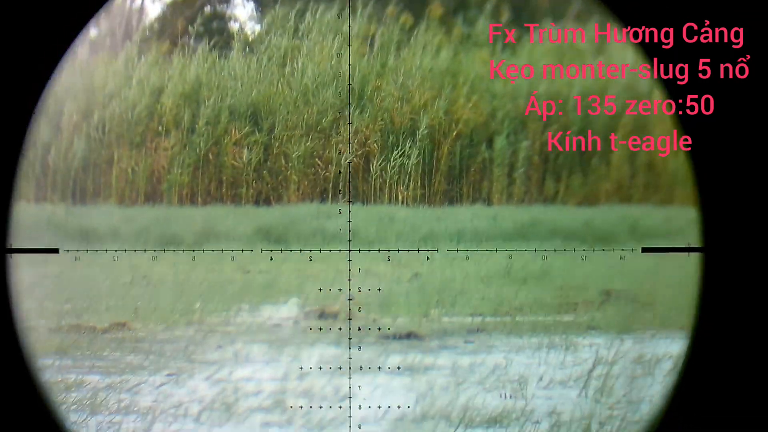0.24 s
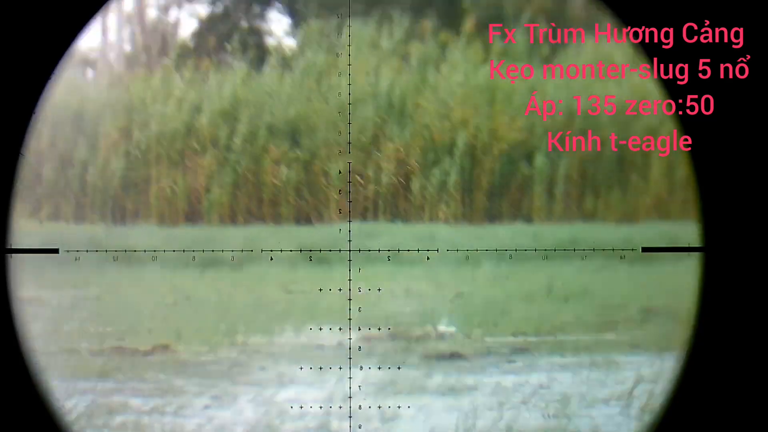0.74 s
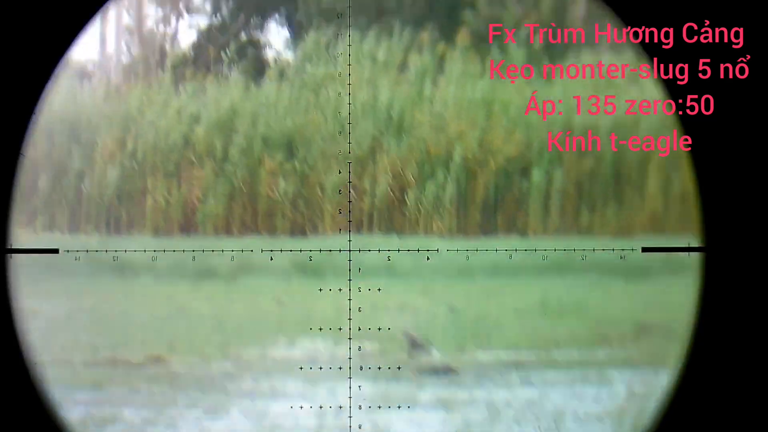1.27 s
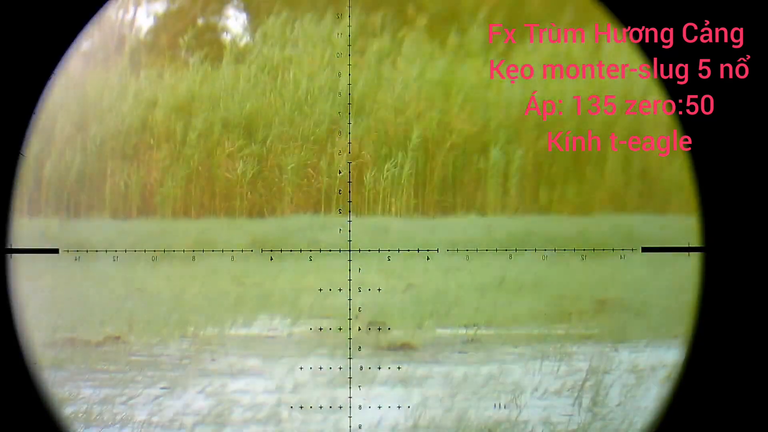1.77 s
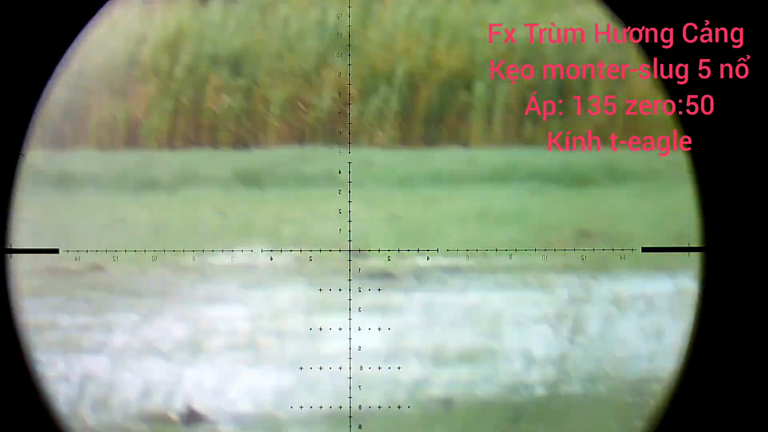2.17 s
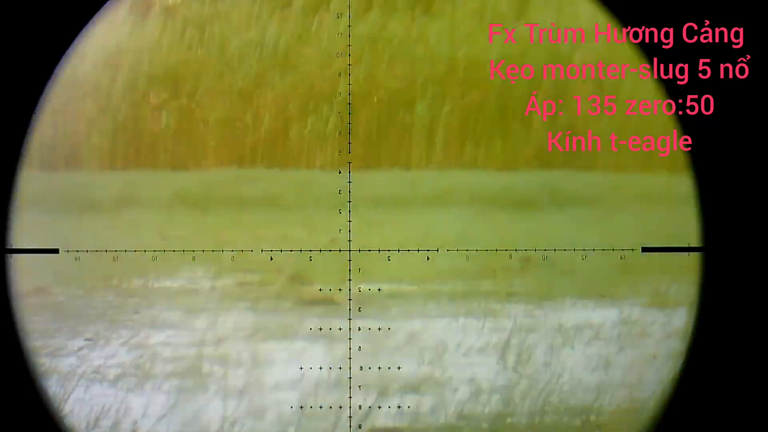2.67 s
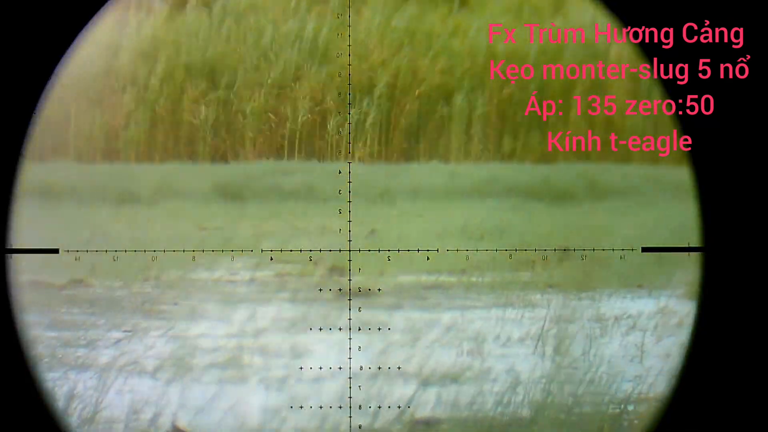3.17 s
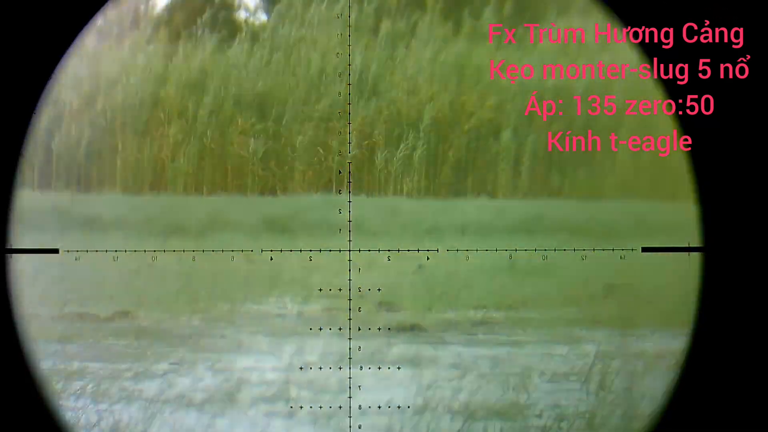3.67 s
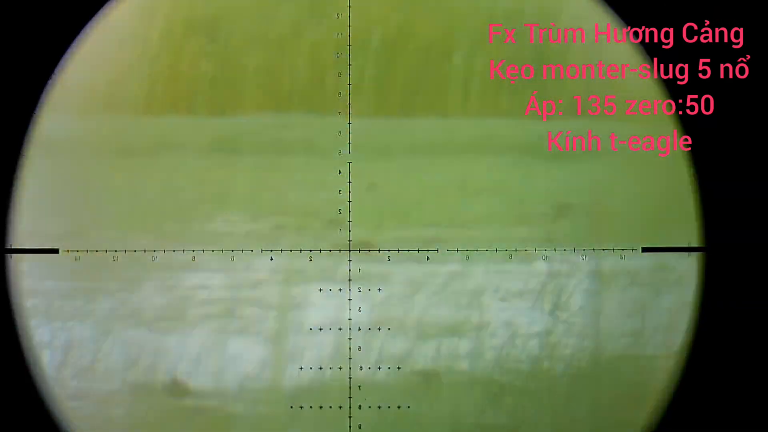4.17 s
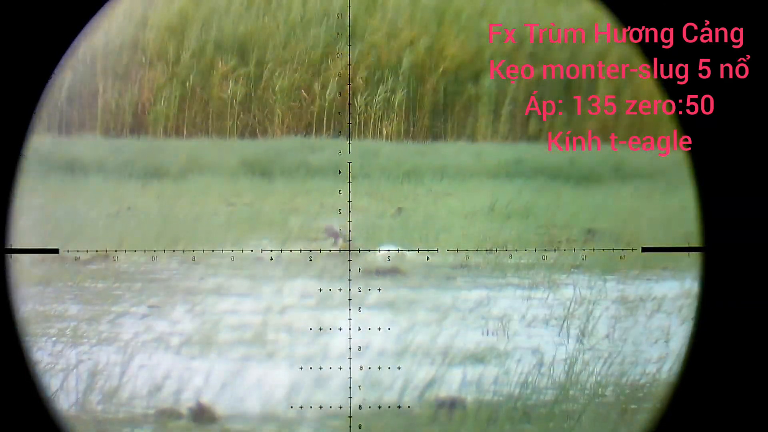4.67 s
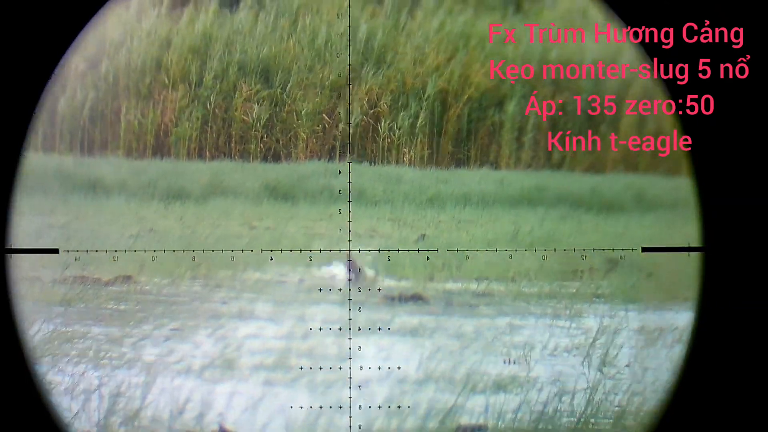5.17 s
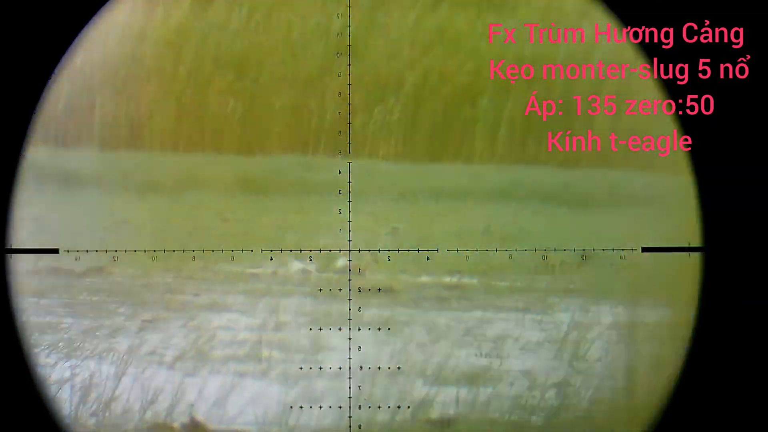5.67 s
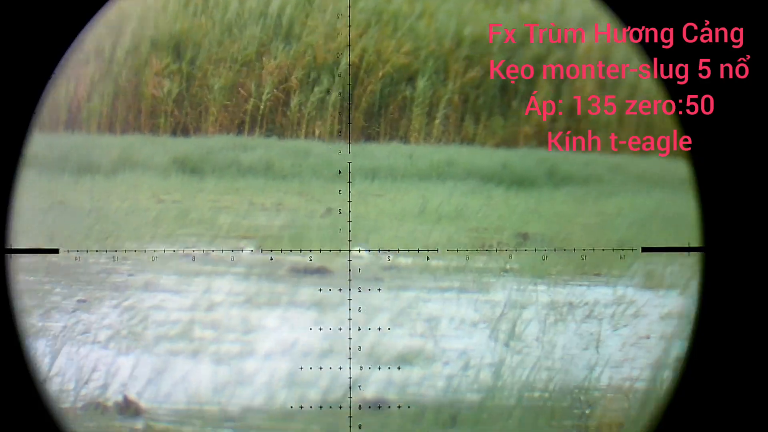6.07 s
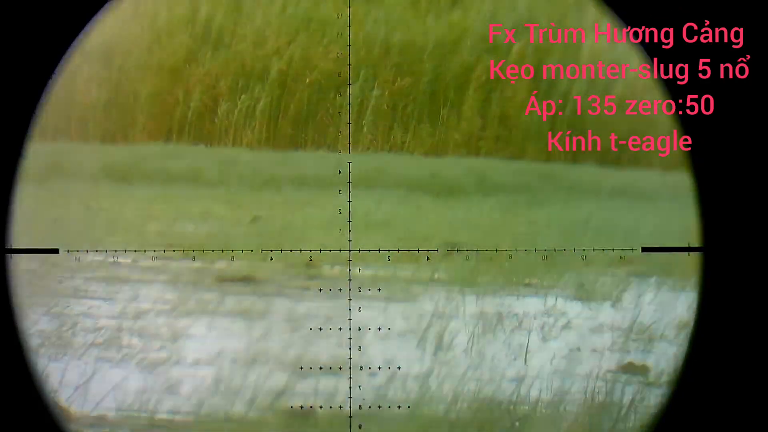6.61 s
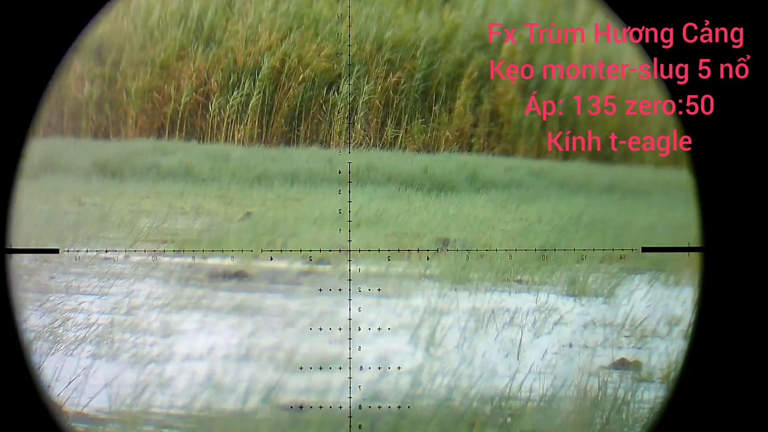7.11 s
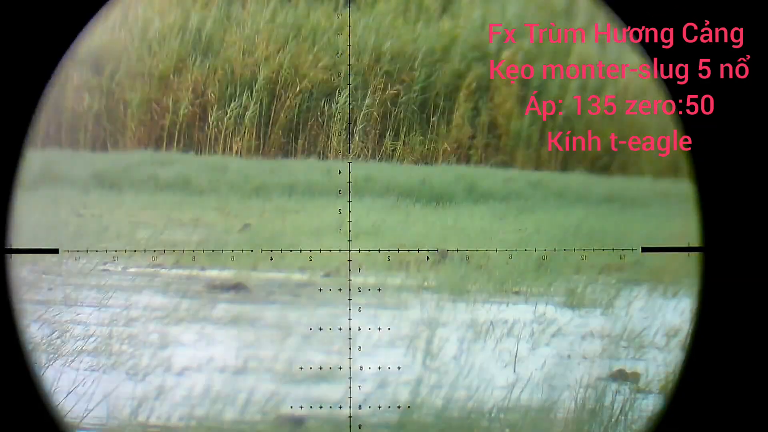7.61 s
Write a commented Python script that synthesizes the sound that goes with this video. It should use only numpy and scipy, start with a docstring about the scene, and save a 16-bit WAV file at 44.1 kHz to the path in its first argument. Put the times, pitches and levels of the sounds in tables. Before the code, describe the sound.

From the start, an air rifle is worked right beside the microphone. A crisp click at 0.14 s is followed by short scratchy slides and knocks at 0.35, 0.53 and 0.7 s. The heaviest metal clacks come in close clusters at 1.0 and 1.15 s, with a last bright snap at 1.43 s, overloading slightly and ringing briefly in a hard, mid-pitched way. A very faint spring tone lingers. From 1.6 to 2.3 s there are only small ticks, soft bumps and skin rubbing the stock, then a dull low thud with a click near 2.4 s. After 2.7 s it is quiet: low, fluttering wind, faint reed rustle, far wash and steady hiss. Soft wing slaps on distant water come around 2.8, 3.0, 3.5, 4.5 and 4.8 s, clearer at 5.5, 5.9 and 6.2 s. The breeze swells near 5.7 s, then sinks to near silence after 6.7 s.

```python
"""An air rifle is reloaded at the edge of a marsh, heard by a phone fixed to its scope.
Lever, catch and magazine blows are noise cracks plus ringing modes, loud enough to clip the microphone.
Sliding parts and rubbing hands are streams of tiny contacts; bumps on the stock are decaying sines.
Filtered noise makes the faint wind and the far wash, random ticks the reeds, and noise bursts
the later slaps of a bird's wings on far water."""
import sys
import numpy as np
from scipy import signal
from scipy.fft import rfft, irfft
from scipy.io import wavfile
from scipy.ndimage import uniform_filter1d

SR = 44100
rng = np.random.default_rng(int(sys.argv[2]) if len(sys.argv) > 2 else 0)


def pcm_store(signal):
    """Save signal as 16-bit PCM."""
    levels = np.round(np.clip(np.atleast_2d(signal), -1, 1) * 32767)
    wavfile.write(sys.argv[1], SR, levels.astype(np.int16).T)


N = 346185
T = np.arange(N) / SR


def undb(db):
    """Decibels to gain."""
    return 10 ** (np.asarray(db) / 20)


def unit(x):
    """Scale to rms 1."""
    return x / np.sqrt(np.mean(x ** 2) + 1e-20)


def add(out, start_s, x):
    """Mix x into out at start_s."""
    i = max(int(start_s * SR), 0)
    out[i:i + len(x)] += x[:N - i]


def cut(x, hz, kind, order=4):
    """Butterworth filter."""
    sos = signal.butter(order, hz, kind, fs=SR, output="sos")
    return signal.sosfilt(sos, x)


def colour(x, points, size=4096):
    """Minimum-phase filter through (Hz, dB) points, built from the cepstrum."""
    hz, db = np.transpose(points)
    bins_hz = np.fft.rfftfreq(size, 1 / SR) + 1
    gain_db = np.interp(np.log(bins_hz), np.log(hz), db)
    cepstrum = irfft(np.log(undb(gain_db)))
    # fold onto positive times: causal
    cepstrum[1:size // 2] *= 2
    cepstrum[size // 2 + 1:] = 0
    impulse = irfft(np.exp(rfft(cepstrum)))
    return signal.fftconvolve(x, impulse)[:len(x)]


def noise(points):
    """Coloured noise over the whole scene, rms 1."""
    return unit(colour(rng.standard_normal(N), points))


def fade(t, t60_s):
    """Exponential decay, 60 dB down after t60_s."""
    return np.exp(-np.log(1000) * t / t60_s)


def swell(t, rise_s):
    """Smooth build-up of force from 0 towards 1."""
    return 1 - np.exp(-(t / rise_s) ** 2)


def walk(rate_hz):
    """Random levels at rate_hz joined by slopes, rms 1."""
    k = int(SR / rate_hz)
    levels = rng.standard_normal(N)[:N // k + 1]
    return unit(uniform_filter1d(np.repeat(levels, k), k)[:N])


def grains(rate_hz, spread_db):
    """Random tiny contacts; a positive spread makes a few much stronger than the rest."""
    hits = rng.random(N) < rate_hz / SR
    strength = undb(spread_db * np.minimum(rng.exponential(size=N), 4))
    return hits * rng.standard_normal(N) * strength


def gesture(start_s, length_s, attack_s, t60_s):
    """Envelope of one movement: it builds up, holds and dies away."""
    attack = np.clip((T - start_s) / attack_s, 0, 1)
    return attack * fade(np.maximum(T - start_s - length_s, 0), t60_s)


def weigh(x, treble_db, bass_db, low_hz=450, high_hz=1700, lowest_hz=115):
    """Set bass and treble rms against the middle band, whose peak becomes 1."""
    bass = unit(cut(x, [lowest_hz, low_hz], "band"))
    middle = unit(cut(x, [low_hz, high_hz], "band"))
    treble = unit(cut(x, high_hz, "high", order=6))
    return (middle + undb(treble_db) * treble + undb(bass_db) * bass) / np.abs(middle).max()


# free modes of the rifle: f/Hz, relative level/dB, t60/s
RIFLE_MODES = [(145, -17, .16), (262, -18, .07), (325, -10, .085), (435, -10, .07), (590, -9, .045),
               (655, 0, .075), (703, -10, .09), (824, -12, .15), (890, -15, .15), (950, 2, .058),
               (1075, -2, .035), (1215, -8, .035), (1300, -5, .036), (1460, -11, .025), (1795, -20, .035),
               (2170, -21, .03), (2375, -12, .04), (2572, -5, .045), (2780, -13, .085), (3195, -18, .028),
               (3540, -17, .024), (4365, -22, .055), (4560, -25, .035), (5540, -33, .045),
               (6080, -32, .022), (6520, -33, .02)]


def ring(t, length=1, scatter_db=0, detune=0):
    """Sum of decaying rifle modes; contact point and grip can vary their levels and tuning."""
    hz, db, t60_s = np.transpose(RIFLE_MODES)[:, :, None]
    chance = rng.standard_normal((2, len(hz), 1))
    waves = np.sin(2 * np.pi * hz * (1 + detune * chance[0]) * t)
    gains = undb(db + scatter_db * chance[1])
    return np.sum(gains * fade(t, t60_s * length) * waves, axis=0)


# strokes of sliding metal parts: t/s, length/s, body level/dB, scratch level/dB before scratch_trim_db
STROKES_T_LEN_DB = [(0, 0.027, -44, -67.5), (0.166, 0.016, -39.5, -51), (0.216, 0.019, -39, -57.5),
                    (0.283, 0.13, -49, -67), (0.518, 0.091, -36.5, -64), (0.653, 0.38, -40, -77.5),
                    (0.967, .12, -33, -75.5), (1.117, .03, -29, -49.5), (1.183, .135, -30, -56.5),
                    (1.338, .05, -38, -75.5), (1.56, 0.312, -56, -79.5)]
# metal rubbing on metal: f/Hz, relative density/dB per Hz
RUB_SPECTRUM = [(88, -38), (150, -12), (247, -12), (319, -7), (405, -13), (655, -3), (832, -7),
                (1300, -8.5), (1440, -11.5), (1650, -33), (2810, -23.5), (3060, -41.5), (4460, -39.5),
                (5110, -46), (9000, -62), (11700, -88), (19800, -120)]
# gritty scratch of hard edges: f/Hz, relative density/dB per Hz
SCRATCH_SPECTRUM = [(1500, -17), (2500, -0.5), (2900, -3), (3150, -7), (4000, -1.5), (4400, 2.5),
                    (5100, -13), (5500, -5), (6800, -15), (7900, -32.5), (9000, -20.5), (10500, -22),
                    (12500, -34), (16000, -43.5)]
STROKE_ATTACK_S, STROKE_T60_S = 0.0088, 0.32
SCRATCH_T60_S = 0.08  # edges stop sooner than the body
RATTLE_HZ, RATTLE_DB = 45, -7  # mean tick rate; level against the catches


def sliding(ring_db=-4, scratch_trim_db=3, split_hz=2700, jerk_db=3.0):
    """Friction: tiny catches keep the rifle ringing; loose parts rattle, hard edges scratch."""
    level, scratch = np.zeros((2, N))
    for start_s, length_s, db, edge_db in STROKES_T_LEN_DB:
        body_move = gesture(start_s, length_s, STROKE_ATTACK_S, STROKE_T60_S)
        edge_move = gesture(start_s, length_s, STROKE_ATTACK_S, SCRATCH_T60_S)
        level = np.maximum(level, undb(db) * body_move)
        scratch = np.maximum(scratch, undb(edge_db) * edge_move)
    jerks = undb(jerk_db * walk(70))
    rattle = unit(grains(RATTLE_HZ, 0))
    catches = unit(grains(4600, spread_db=1.0) * jerks) + undb(RATTLE_DB) * rattle
    ringing = unit(signal.fftconvolve(catches, ring(T[:SR // 3]))[:N])
    rub = unit(colour(catches, RUB_SPECTRUM)) + undb(ring_db) * ringing
    body = unit(cut(rub, split_hz, "low")) * level
    grit = unit(grains(2500, spread_db=3) * jerks * undb(3 * walk(90))) + undb(-4) * rattle
    edge = unit(colour(grit, SCRATCH_SPECTRUM)) * scratch * undb(scratch_trim_db)
    return body + edge


# wind strength: t/s, level/dB before rush_db and random swells
GUST_T_DB = [(2.7, -50.5), (3.3, -51), (4.25, -51.5), (4.58, -47), (5.0, -52), (5.3, -47), (5.68, -42.5),
             (6.0, -46.5), (6.3, -45.5), (6.7, -55.5), (6.95, -62), (7.5, -60.5), (7.8, -58.5)]
# rush of air: f/Hz, relative density/dB per Hz
WIND_SPECTRUM = [(71, -31), (120, 3.5), (377, -2), (417, -6), (479, -5.5), (642, -9.5), (720, -18.5),
                 (893, -20.5), (1070, -28.5), (1430, -36.5), (1730, -50), (2500, -49.5), (3250, -76),
                 (5500, -120)]
# eddies on the microphone: f/Hz, relative density/dB per Hz
RUMBLE_SPECTRUM = [(15, -2), (30, -3.5), (50, 1), (90, -2), (140, -3.5), (200, -9), (400, -28.5),
                   (1000, -61)]
# rustle of dry reeds: f/Hz, relative density/dB per Hz
REEDS_SPECTRUM = [(900, -16), (1600, -6.5), (2400, -3), (2900, -5), (3600, 8), (4200, -0.5), (5000, -15.5),
                  (6500, -12.5), (8000, -23), (14000, -35.5)]
BREEZE_DB = -51  # reference strength
# level at the reference, and dB per dB of gust
RUMBLE_DB, RUMBLE_DB_PER_DB = -45.5, 0.38
REEDS_DB, REEDS_DB_PER_DB = -78.5, 0.6


def wind(rush_db=2.0, eddy_db=1.7, swell_db=0.77, flutter_db=5.0, tick_db=-10):
    """One gust strength drives air rush, eddies on the microphone and reeds ticking together."""
    gust_db = np.interp(T, *np.transpose(GUST_T_DB)) - BREEZE_DB + swell_db * walk(10)
    air_db = BREEZE_DB + gust_db + rush_db + eddy_db * walk(25)
    rumble_db = RUMBLE_DB + RUMBLE_DB_PER_DB * gust_db + eddy_db * walk(4.2)
    reeds_db = REEDS_DB + REEDS_DB_PER_DB * gust_db
    air = noise(WIND_SPECTRUM) * undb(air_db)
    rumble = noise(RUMBLE_SPECTRUM) * undb(rumble_db)
    leaves = unit(grains(3000, spread_db=2.5) * undb(flutter_db * walk(42)))
    stalks = unit(grains(8, spread_db=0))
    rustle = unit(colour(leaves + undb(tick_db) * stalks, REEDS_SPECTRUM))
    return air + rumble + rustle * undb(reeds_db)


# wash of the land around: f/Hz, relative density/dB per Hz
FAR_SPECTRUM = [(100, -12), (250, -2), (400, -6), (560, -1), (700, -3), (820, -13), (1400, -19),
                (1800, -25), (2600, -28), (4000, -45)]


def distance(level_db=-60, waver_db=1.9):
    """Soft wash of the land beyond the marsh: noise with a slight random waver."""
    return noise(FAR_SPECTRUM) * undb(level_db + waver_db * walk(2.9))


# blows of lever, catch and magazine: t/s, middle-band peak level/dB, treble/dB, bass/dB (re middle band)
KNOCKS_T_DB = [(0.123, -36, -2.5, -0.5), (0.138, -31, 9, -23), (0.1384, -7.5, -8.5, -26.5),
               (0.193, -31, 10, -7), (.226, -19.5, -17.5, -2), (0.35, -13, -17.5, -19),
               (.397, -29, -10.5, -10), (.44, -39, -15.5, -5), (.533, -8, -23, -23.5),
               (.556, -18.5, -25.5, -8), (.602, -21.5, -22, 1), (0.69, -10.5, -14.5, -22),
               (0.707, -2.5, -26.5, -5), (.821, -27, -26, -5), (0.883, -29.5, -25, -13),
               (0.9953, 2.5, -19.5, -9.5), (1.0126, -0.5, -14, -16.5), (1.024, -7.5, -17.5, -13),
               (1.076, -16, -25, -3), (1.116, -34.5, -9, -2.5), (1.1415, 2, -18, -12),
               (1.1513, 0.5, -20.5, -14), (1.173, -10.5, -19, -10), (1.212, -15, -23, -2),
               (1.223, -11.5, -22, -2), (1.302, -22, -19.5, -9), (1.327, -17.5, -27, -3),
               (1.4257, 2, -11.5, -16.5), (1.607, -36, -18.5, -2), (1.764, -41.5, -32, -6),
               (2.372, -32, -22, 8.5), (2.386, -23, -17, -18), (2.44, -41.5, -15.5, 10.5),
               (2.59, -39.5, -17, -19.5)]
# short crack of a contact: f/Hz, relative density/dB per Hz
CRACK_SPECTRUM = [(80, -19.5), (300, -4), (700, 0.5), (1300, 7), (1750, -16), (2500, -2.5), (3100, -16.5),
                  (4600, -14.5), (5300, -29), (6800, -32), (7900, -48.5), (10000, -39), (13000, -61),
                  (16000, -66)]
# second contact: delay, loss after a 0 dB blow, extra dB per dB of blow, softer treble
REBOUND_S, REBOUND_DB, REBOUND_DB_PER_DB, REBOUND_TREBLE_DB = 0.003, -4, 2.17, -4.5
# share of the free ring length left by the hands; hard blows shake the grip loose
RING_SHARE, RING_SHARE_PER_DB, RING_SHARE_MIN = 0.76, 0.04, 0.2
CLICK_HZ, CLICK_HZ_PER_DB = 1700.5, 148  # treble split, higher for bright, light catches


def action(crack_t60_s=0.028, contact_s=0.0007):
    """Metal parts strike and rebound: a short crack, then the rifle rings, damped by the hands."""
    out, t = np.zeros(N), T[:SR // 8]
    force = swell(t, contact_s)
    rebound_trims = REBOUND_DB, REBOUND_DB_PER_DB, REBOUND_TREBLE_DB
    for start_s, db, treble_db, bass_db in KNOCKS_T_DB:
        length = max(RING_SHARE + RING_SHARE_PER_DB * db, RING_SHARE_MIN)
        click_hz = CLICK_HZ + CLICK_HZ_PER_DB * max(treble_db, 0)
        for late_s, (loss_db, loss_per_db, dull_db) in (0, (0, 0, 0)), (REBOUND_S, rebound_trims):
            burst = rng.standard_normal(len(t)) * force * fade(t, crack_t60_s)
            crack = colour(burst, CRACK_SPECTRUM)
            modes = force * ring(t, length, scatter_db=3, detune=0.009)
            blow = unit(modes) + undb(-2) * unit(crack)
            blow = weigh(blow, treble_db + dull_db, bass_db, high_hz=click_hz)
            add(out, start_s + late_s, undb(db + loss_db + loss_per_db * db) * blow)
    return out


SPRING_HZ, SPRING_T60_S = (2772, 2796), 0.75


def spring(shake, level_db=-78):
    """Coil spring: two close, beating modes, shaken by the action, sing on faintly."""
    t = T[:SR]
    tone = fade(t, SPRING_T60_S) * sum(np.sin(2 * np.pi * hz * t) for hz in SPRING_HZ)
    return undb(level_db) * unit(signal.fftconvolve(shake, tone)[:N])


# soft bumps of the hand on the stock: t/s, level/dB before the envelope, f/Hz
BUMPS_T_DB_HZ = [(0.36, -22, 88), (1.683, -29.5, 139.2), (1.925, -22.5, 320.8), (1.948, -23.5, 324),
                 (2.05, -25, 118.9), (2.375, -12, 289), (2.383, -7.5, 172), (2.396, -13.5, 147)]


def bumps(push_s=0.0027, t60_s=0.075):
    """A soft hand pushes slowly, so only a low thud sounds: a decaying sine."""
    out, t = np.zeros(N), T[:SR // 4]
    envelope = swell(t, push_s) * fade(t, t60_s)
    for start_s, db, hz in BUMPS_T_DB_HZ:
        add(out, start_s, undb(db) * envelope * np.sin(2 * np.pi * hz * t))
    return out


# hand shifts on the stock: t/s, length/s, level/dB
SHIFTS_T_LEN_DB = [(1.871, 0.17, -45), (2.162, 0.094, -49), (2.351, 0.097, -43), (2.46, 0.18, -51.5)]
# skin on the stock: f/Hz, relative density/dB per Hz
SKIN_SPECTRUM = [(120, -12.5), (210, -7.5), (320, 7), (450, -16), (650, 8), (800, -3), (980, 1.5),
                 (1300, -4), (1700, -24), (2500, -26.5), (3100, -37), (6500, -41.5), (9000, -47.5)]
SHIFT_ATTACK_S, SHIFT_T60_S = 0.0142, 0.5


def rubbing(jerk_db=2, spread_db=3):
    """Skin drags over the stock in small, dull slips."""
    moves = [undb(db) * gesture(start_s, length_s, SHIFT_ATTACK_S, SHIFT_T60_S)
             for start_s, length_s, db in SHIFTS_T_LEN_DB]
    slips = grains(1500, spread_db) * undb(jerk_db * walk(34.18))
    return unit(colour(slips, SKIN_SPECTRUM)) * np.max(moves, axis=0)


# far wing slaps on water: t/s, middle-band peak level/dB before trim_db
SLAPS_T_DB = [(2.755, -43.5), (2.996, -45), (3.477, -40.5), (4.537, -42.5), (4.80, -48.5), (5.542, -34),
              (5.857, -33), (6.213, -35), (6.367, -46)]
# spray: f/Hz, relative density/dB per Hz, before the band weighting
SPLASH_SPECTRUM = [(100, -21), (400, 7), (650, 14.5), (820, 2.5), (1080, 11), (1400, -5), (1800, -15.5),
                   (4000, -11), (6500, -37), (14000, -62)]


def slaps(rise_s=0.003, t60_s=0.04, trim_db=-1, treble_db=-26, bass_db=2):
    """Each far wing beat throws up spray: a short coloured noise burst."""
    out, t = np.zeros(N), T[:SR // 5]
    envelope = swell(t, rise_s) * fade(t, t60_s)
    for start_s, db in SLAPS_T_DB:
        spray = colour(rng.standard_normal(len(t)) * envelope, SPLASH_SPECTRUM)
        add(out, start_s, undb(db + trim_db) * weigh(spray, treble_db, bass_db))
    return out


def scene():
    """The rifle close by, the marsh behind it."""
    blows = action()
    rifle = sliding() + blows + spring(blows) + bumps() + rubbing()
    marsh = wind() + distance() + slaps()
    return (rifle + marsh)[None]


# microphone hiss: f/Hz, relative density/dB per Hz
HISS_SPECTRUM = [(100, 3), (4000, 4.5), (8000, -1.5), (11000, -5), (15000, -1), (16000, 3)]
TOP_HZ = 15800


def record(dry, hiss_db=-76.0, clip_level=0.96):
    """The phone clips the loudest peaks, dips narrowly in the treble, hisses and cuts the top."""
    clipped = dry / (1 + np.abs(dry / clip_level) ** 12) ** (1 / 12)
    dipped = signal.lfilter(*signal.iirnotch(7950, 5, fs=SR), clipped)
    hiss = undb(hiss_db) * noise(HISS_SPECTRUM)
    top_cut = signal.ellip(10, 0.1, 80, TOP_HZ, fs=SR, output="sos")
    return signal.sosfilt(top_cut, dipped + hiss)


dry = scene()
out = record(dry)
pcm_store(out)
```